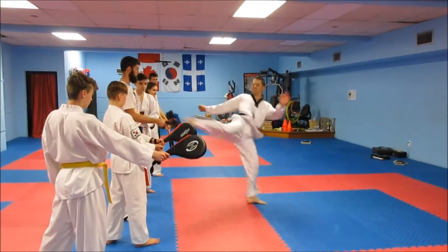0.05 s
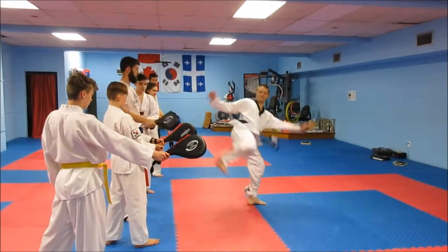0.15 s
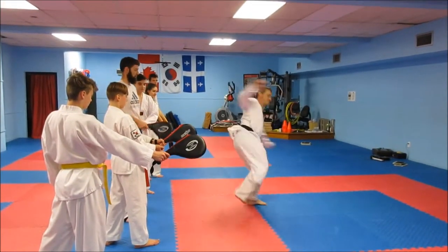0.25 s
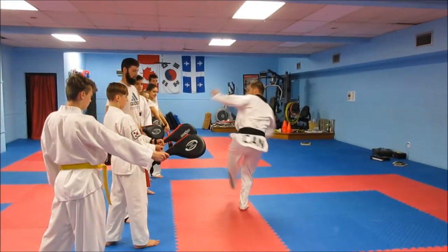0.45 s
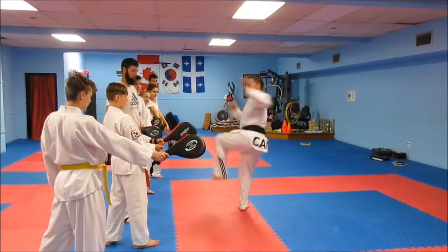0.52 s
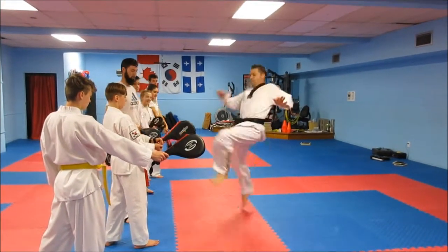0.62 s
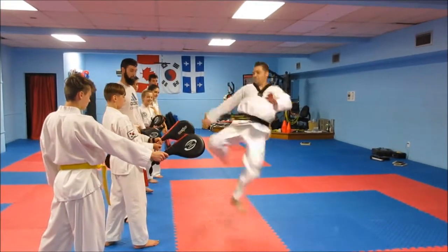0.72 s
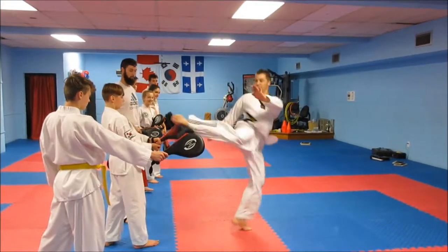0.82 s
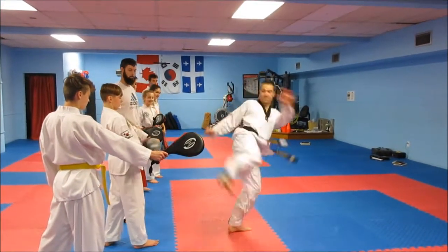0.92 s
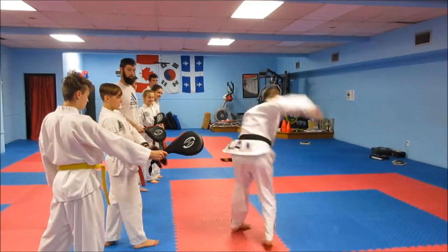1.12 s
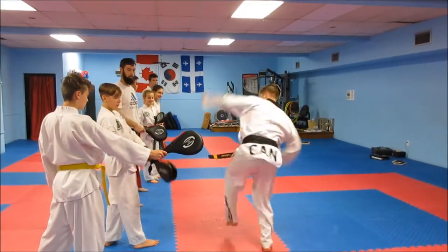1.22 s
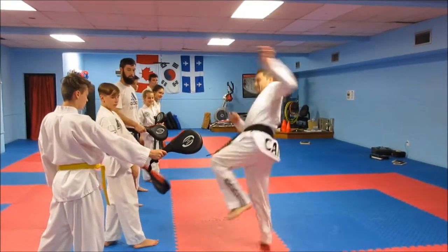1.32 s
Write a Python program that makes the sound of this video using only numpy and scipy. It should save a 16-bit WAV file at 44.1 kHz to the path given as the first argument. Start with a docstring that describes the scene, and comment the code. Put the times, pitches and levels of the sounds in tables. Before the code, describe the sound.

Two loud kicks on hand-held paddle targets stand out in an echoing gym. After a faint cloth swish, the first smacks at about 0.2 seconds, slightly overloading the microphone and ringing through the hall. Bare feet slap softly on foam mats around 0.6 seconds, and a uniform swishes near 0.8. The second smack comes at 1.0 seconds with its own echo, and a light step lands at 1.3.

```python
"""A hard-walled gym is still ringing faintly as a cotton uniform swishes and a bare foot lands on foam.
A spinning kick smacks a hand-held, two-leaf paddle target: the padded paddle rings for a few
milliseconds, its leaves clap together, the microphone overloads and the hall rings on.
Feet slap the mats and cloth swishes again, a second kick hits another paddle, and a last step lands."""
import sys
import numpy as np
from scipy import signal
from scipy.fft import rfft, irfft, next_fast_len
from scipy.io import wavfile

SR = 44100
rng = np.random.default_rng(int(sys.argv[2]) if len(sys.argv) > 2 else 0)


def to_wav(s):
    """Save 16-bit WAV."""
    ch = np.atleast_2d(s).T  # columns
    pcm = np.round(np.clip(ch, -1, 1) * 32767)  # PCM
    wavfile.write(sys.argv[1], SR, pcm.astype(np.int16))


N = 59535


def amp(db):
    """Decibels to gain."""
    return 10 ** (np.asarray(db) / 20)


def along(curve, hz):
    """Read a (freq_hz, value) curve on a log frequency axis."""
    freqs, values = np.transpose(curve)
    return np.interp(np.log(hz + 1), np.log(freqs + 1), values)


def filtered(x, response):
    """EQ x with a gain given as a function of frequency."""
    size = next_fast_len(N + 8192)
    return irfft(rfft(x, size) * response(np.fft.rfftfreq(size, 1 / SR)), size)[:N]


def noise(colour, tilt_db=0):
    """Coloured noise of rms 1, tilted by tilt_db per octave above 700 Hz."""
    def eq(hz):
        return amp(along(colour, hz) + tilt_db * np.log2(np.maximum(hz / 700, 1)))
    x = filtered(rng.standard_normal(N), eq)
    return x / np.sqrt(np.mean(x ** 2) + 1e-20)


def since(start_s):
    """Seconds since start_s, zero before it."""
    return np.maximum(np.arange(N) / SR - start_s, 0)


def fade(t, t60_s):
    """Exponential decay, 60 dB down after t60_s."""
    return amp(-60 * t / t60_s)


def strike(start_s, attack_s, t60_s):
    """Envelope of a hit: quick attack, exponential decay."""
    t = since(start_s)
    return (1 - np.exp(-t / attack_s)) * fade(t, t60_s)


def swell(peak_s, rise_s, fall_s):
    """Envelope that grows to a peak and dies away."""
    t = np.arange(N) / SR - peak_s
    return np.exp(1 - np.hypot(1, 2 * t / np.where(t < 0, rise_s, fall_s)))


# colour of the gym's steady air: freq_hz, level_db
AIR_COLOUR = [(25, -1), (60, -5), (150, 7), (450, 4), (900, 1), (1600, -9), (4000, -15.5), (10000, -23),
              (15000, -29)]
# colour of the opening reverb tail: freq_hz, level_db
LINGER_COLOUR = [(80, -18), (200, -1.5), (500, -3.5), (1000, -6), (2000, -13.5), (5000, -48), (12000, -53)]
def room_tone():
    """A bed of steady air, with the hall still ringing as the scene opens."""
    air = amp(-53) * noise(AIR_COLOUR)
    tail = amp(-50.5) * fade(since(0), t60_s=1.86) * noise(LINGER_COLOUR)
    return air + tail


# rumbles underfoot: peak_s, level_db, rise_s, fall_s
FOOT_RUMBLES = [(.06, -51, 0.14, 0.078), (1.335, -43.5, 0.026, 0.017)]
# colour of the rumble: freq_hz, level_db
RUMBLE_COLOUR = [(12, -33), (26, -22), (33, 11), (45, -18), (80, -18), (300, -67)]
def rumbles():
    """Faint sub-bass swells under the moving feet."""
    return sum(amp(level_db) * swell(peak_s, rise_s, fall_s) * noise(RUMBLE_COLOUR)
               for peak_s, level_db, rise_s, fall_s in FOOT_RUMBLES)


# swishes: peak_s, level_db, rise_s, fall_s, tilt_db_per_octave
CLOTH_SWISHES = [(.018, -47.5, 0.016, 0.035, 4), (.09, -53.5, 0.037, 0.04, -1.5),
                 (0.564, -47, 0.012, 0.0094, 0.5), (.8, -53, 0.091, 0.038, 4)]
# colour of rubbing cotton: freq_hz, level_db
CLOTH_COLOUR = [(100, -4), (600, 7.5), (1500, 7), (3000, 3.5), (7000, -5.5), (12000, -11), (15000, -19)]
def swishes():
    """Cloth and sliding soles swish as the kicker turns."""
    return sum(amp(level_db) * swell(peak_s, rise_s, fall_s) * noise(CLOTH_COLOUR, tilt_db)
               for peak_s, level_db, rise_s, fall_s, tilt_db in CLOTH_SWISHES)


# bare feet landing: start_s, slap_db, thump_db, slap_t60_s, tilt_db_per_octave
FOOTFALLS = [(0.064, -51, -80, .12, -6), (0.553, -31.5, -47, 0.025, -5), (0.657, -36.5, -71, 0.034, -4.5),
             (.689, -43, -68, 0.11, -7.5), (0.971, -43.5, -68, 0.016, -44), (1.307, -31, -44, 0.033, -0.5)]
# colour of the sole's slap: freq_hz, level_db
SOLE_COLOUR = [(100, -4), (350, -4), (600, 4), (1200, 5.5), (2600, 2), (5000, -0.5), (8000, -5),
               (15000, -12)]
# colour of the foam's thump: freq_hz, level_db
MAT_COLOUR = [(25, -13), (60, 8.5), (150, 4.5), (260, 9), (450, -25), (1500, -56)]
def footfalls():
    """A sole slaps the mat, the foam gives a dull thump and the hall answers faintly."""
    attack_s = 0.00071
    steps = np.zeros(N)
    for start_s, slap_db, thump_db, slap_t60_s, tilt_db in FOOTFALLS:
        slap = strike(start_s, attack_s, slap_t60_s) * noise(SOLE_COLOUR, tilt_db)
        hall = amp(-14.5) * hall_wash(start_s, SOLE_COLOUR, tilt_db)
        thump = strike(start_s, attack_s, t60_s=0.36) * noise(MAT_COLOUR)
        steps += amp(slap_db) * (slap + hall) + amp(thump_db) * thump
    return steps


def grain(start_s):
    """Gain that flutters with a hit's separate reflections, then evens out as the tail thickens."""
    depth_db, reflections_per_s = 2.5, 410
    position = np.arange(N) / SR * reflections_per_s
    flutter = np.interp(position, np.arange(N), rng.standard_normal(N))
    return amp(depth_db * fade(since(start_s), t60_s=1.05) * flutter)


# reverb time of the gym: freq_hz, t60_s
HALL_DECAY = [(100, 0.91), (350, 1), (900, 0.78), (2000, 0.88), (5000, 0.73), (8000, 0.63), (14000, 0.48)]
def hall_wash(start_s, colour, tilt_db=0):
    """Diffuse reverb of a hit: a quick scatter, then a tail whose treble dies first."""
    scatter_gain, build_s = amp(-1.5), 0.0015
    hz, frame_s, spectrum = signal.stft(noise(colour, tilt_db), SR, nperseg=256)
    age_s = np.maximum(frame_s - start_s, 0)
    scatter = scatter_gain * fade(age_s, t60_s=0.42)
    tail = fade(age_s, along(HALL_DECAY, hz)[:, None])
    wash = signal.istft(spectrum * (scatter + tail) / (1 + scatter_gain), SR, nperseg=256)[1][:N]
    return wash * grain(start_s) * (1 - np.exp(-since(start_s) / build_s))


# modes of each paddle: pitch_hz, level_db, t60_s
FIRST_MODES = [(394, -2.5, 0.039), (461, 1, 0.056), (638, -5, 0.085), (780, -40, 0.0235), (963, 6, 0.025),
               (1251, -15, 0.12), (1662, -6.5, 0.076), (2087, -14, 0.085), (2995, -16, 0.062),
               (5760, -16.5, 0.041)]
SECOND_MODES = [(275, -23, 0.011), (520, 0, 0.019), (626, 5, 0.021), (730, -5, 0.034), (1090, 3.5, .022),
                (1480, -1, 0.022), (2020, -7.5, 0.033), (4180, -9, 0.014), (5760, -5.5, 0.0092)]
def paddle_ring(modes, start_s):
    """The paddle's modes ring out, their attack softened by the padding."""
    attack_s = 0.0014
    t = since(start_s)
    onset = 1 - np.exp(-(t / attack_s) ** 2)
    return onset * sum(amp(level_db) * fade(t, t60_s) * np.sin(2 * np.pi * pitch_hz * t)
                       for pitch_hz, level_db, t60_s in modes)


# colour of the leaves' crack: freq_hz, level_db
CRACK_COLOUR = [(200, 5), (700, 3), (2000, 12), (3500, 3.5), (5500, 0.5), (7500, -3), (12000, -4.5),
                (15500, -20)]
def leaf_crack(clap_s, rebound_s):
    """The two leaves clap together with a bright crack, then again, softer, on the rebound."""
    attack_s, t60_s = 0.0001, 0.011
    claps = strike(clap_s, attack_s, t60_s) + amp(-6) * strike(rebound_s, attack_s, t60_s)
    return claps * noise(CRACK_COLOUR)


# kicks: start_s, ring_db, contact_s, crack_db, thud_db, thud_hz,
# clap_delay_s, rebound_delay_s, second_ring_db (relative to the first ring), hall_db
KICK_HITS = [(0.2251, -2.5, 0.011, -8, -11, 123, 0.0016, .004, -19, -19.5),
             (1.0142, -4, 0.0059, -10, -30, 132, 0.002235, 0.00456, -14, -23)]
# colour of each kick's reverb: freq_hz, level_db
FIRST_HALL_COLOUR = [(45, -41), (95, -17), (145, -7.5), (220, -9), (340, -0.5), (490, 0), (570, -12.5),
                     (660, -2), (820, -3.5), (1020, -4.5), (1400, -13.5), (1680, -11.5), (2200, -18.5),
                     (3000, -18), (4300, -20.5), (5800, -20.5), (8000, -25.5), (15000, -37)]
SECOND_HALL_COLOUR = [(45, -18), (100, -21), (190, -10), (275, -10.5), (360, -9.5), (480, -2.5),
                      (610, -0.5), (780, -6), (910, -10), (1040, -6.5), (1300, -10.5), (1700, -19),
                      (1980, -13.5), (2700, -23), (4000, -24.5), (5400, -20), (7500, -31), (15000, -39.5)]
def kick(hit, modes, hall_colour, reflections, waves):
    """A paddle thuds, rings while the foot presses, then is damped; its leaves clap; the hall answers."""
    (start_s, ring_db, contact_s, crack_db, thud_db, thud_hz,
     clap_delay_s, rebound_delay_s, second_ring_db, hall_db) = hit
    clap_s = start_s + clap_delay_s
    thud = paddle_ring([(thud_hz, thud_db, 0.012)], start_s)  # one low mode with a 12 ms decay
    ring = paddle_ring(modes, start_s) + amp(second_ring_db) * paddle_ring(modes, clap_s)
    damping = np.exp(-(since(start_s) / contact_s) ** 6)
    crack = leaf_crack(clap_s, start_s + rebound_delay_s)
    low_cut = signal.butter(2, 73, "high", fs=SR, output="sos")  # keeps stray bass out of the smack
    smack = signal.sosfilt(low_cut, thud + amp(ring_db) * damping * ring + amp(crack_db) * crack)
    hall = hall_wash(start_s, hall_colour) + standing_waves(start_s, waves)
    return smack + early_reflections(smack, reflections) + amp(hall_db) * hall


# hall resonances stirred by each kick: pitch_hz, level_db, t60_s
FIRST_HALL_WAVES = [(157, -38, 0.28), (338.6, -7, .7), (409, -17.5, 1.0), (651, -27, 0.54), (926, -19, .37)]
SECOND_HALL_WAVES = [(267, -8.5, 0.34), (481, -26, 0.77), (593, -7.5, 0.5), (990, 0.5, 0.25)]
def standing_waves(start_s, waves):
    """Notes of the hall that take a few crossings to form, then linger."""
    t, build_s = since(start_s), 0.016
    return sum(amp(level_db) * strike(start_s, build_s, t60_s)
               * np.sin(2 * np.pi * (pitch_hz * t + rng.random()))
               for pitch_hz, level_db, t60_s in waves)


# delay taps of each kick: delay_s, level_db
FIRST_REFLECTIONS = [(.0086, -25), (0.0206, -17.5)]
SECOND_REFLECTIONS = [(.0075, -20.5), (.0098, -14), (0.0149, -22)]
def early_reflections(smack, reflections):
    """The smack bounces off the nearest surfaces: floor, ceiling and walls."""
    return sum(amp(level_db) * np.pad(smack, (int(delay_s * SR), 0))[:N]
               for delay_s, level_db in reflections)


# echo cluster of each kick: peak_delay_s, level_db, rise_s, fall_s, tilt_db_per_octave
FAR_ECHOES = [(0.022, -29.5, 0.0043, .006, 1.5), (.03, -21.5, 0.0098, .017, -5)]
def far_walls():
    """The far walls return each kick as a dense cluster of echoes."""
    echoes = np.zeros(N)
    for hit, colour, cluster in zip(KICK_HITS, (FIRST_HALL_COLOUR, SECOND_HALL_COLOUR), FAR_ECHOES):
        start_s = hit[0]
        peak_delay_s, level_db, rise_s, fall_s, tilt_db = cluster
        envelope = swell(start_s + peak_delay_s, rise_s, fall_s) * (since(start_s) > 0)
        echoes += amp(level_db) * envelope * grain(start_s) * noise(colour, tilt_db)
    return echoes


def scene():
    """Mono mix: both kicks up front, footwork and room tone beneath."""
    first = kick(KICK_HITS[0], FIRST_MODES, FIRST_HALL_COLOUR, FIRST_REFLECTIONS, FIRST_HALL_WAVES)
    second = kick(KICK_HITS[1], SECOND_MODES, SECOND_HALL_COLOUR, SECOND_REFLECTIONS, SECOND_HALL_WAVES)
    return (first + second + far_walls() + footfalls() + swishes() + rumbles() + room_tone())[None]


def record(dry):
    """The overloaded microphone flattens the loudest peaks and passes nothing above its band limit."""
    ceiling, hardness, top_hz = 0.93, 9, 15300
    clipped = dry[0] / (1 + np.abs(dry[0] / ceiling) ** hardness) ** (1 / hardness)
    return filtered(clipped, lambda hz: hz < top_hz)[None]


dry = scene()
out = record(dry)
to_wav(out)
```